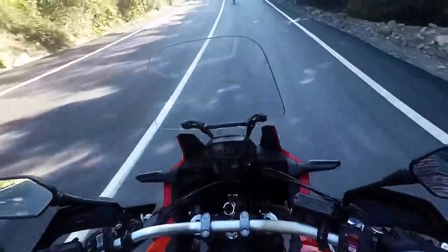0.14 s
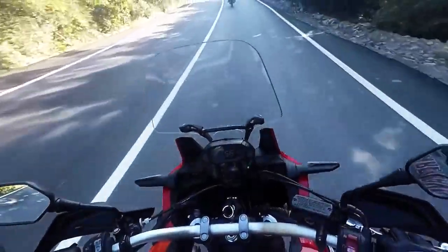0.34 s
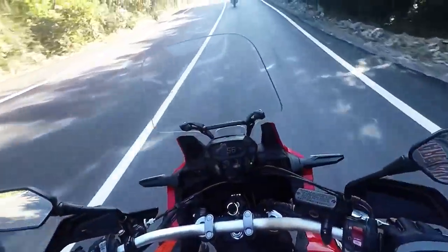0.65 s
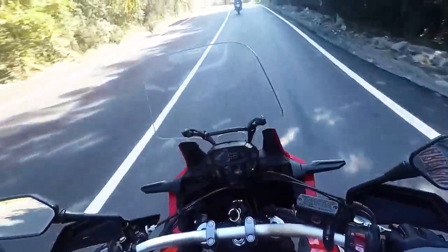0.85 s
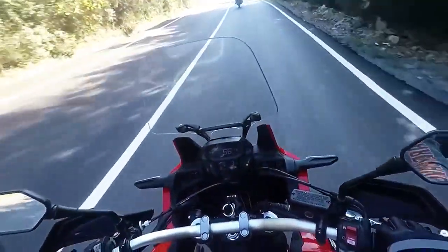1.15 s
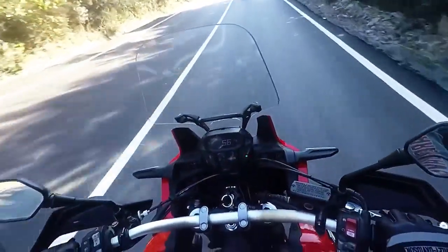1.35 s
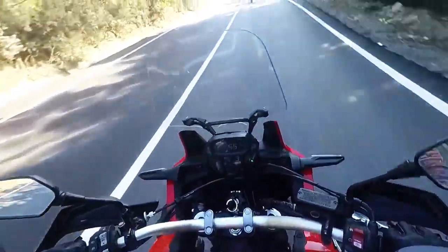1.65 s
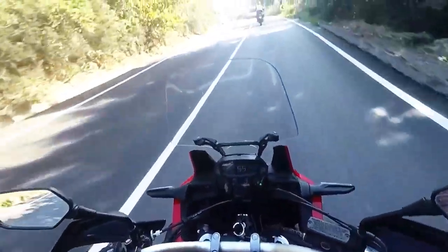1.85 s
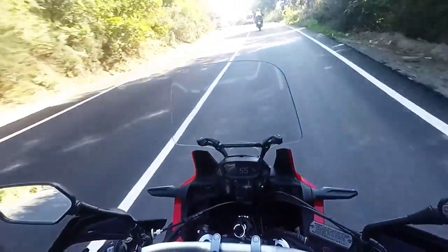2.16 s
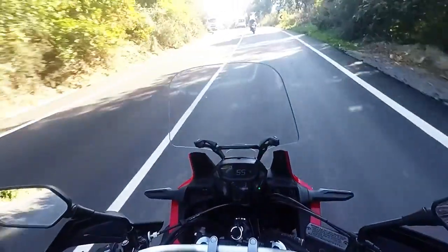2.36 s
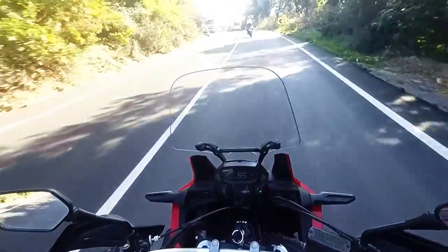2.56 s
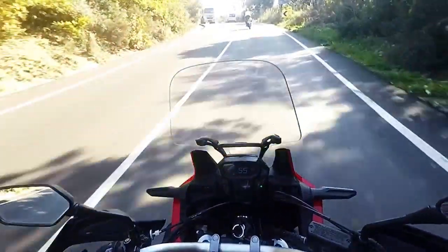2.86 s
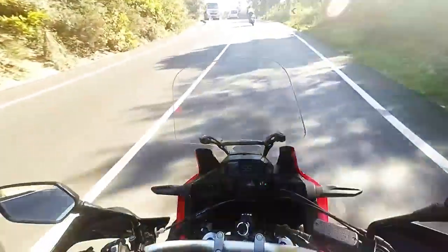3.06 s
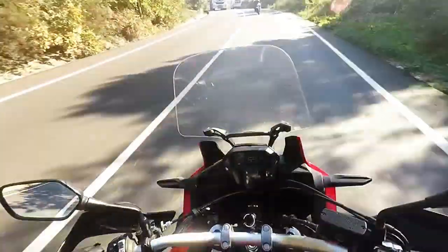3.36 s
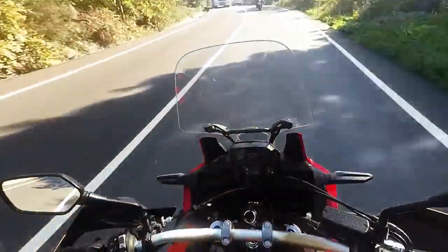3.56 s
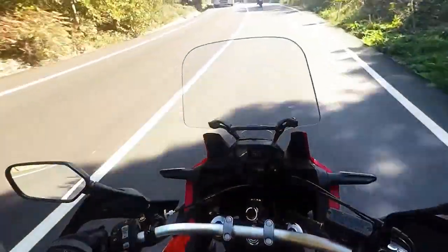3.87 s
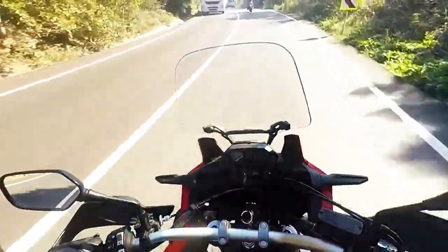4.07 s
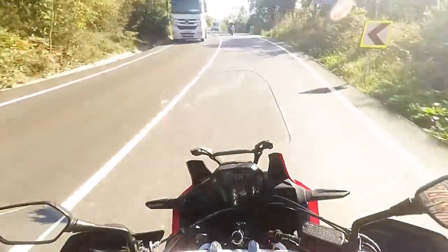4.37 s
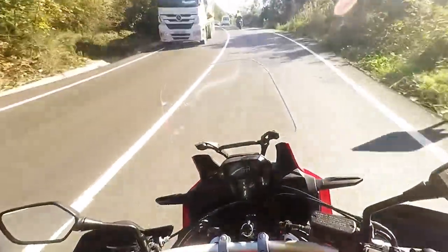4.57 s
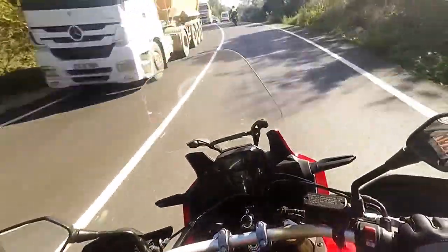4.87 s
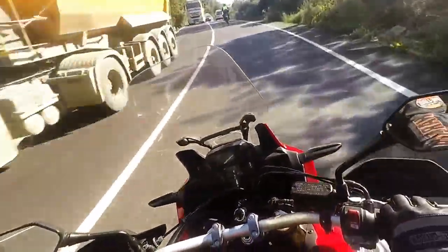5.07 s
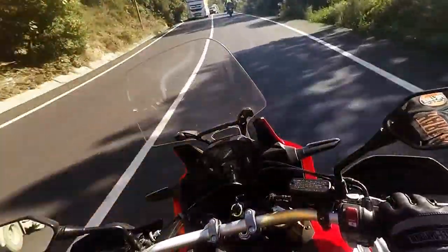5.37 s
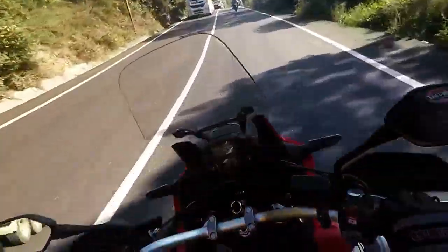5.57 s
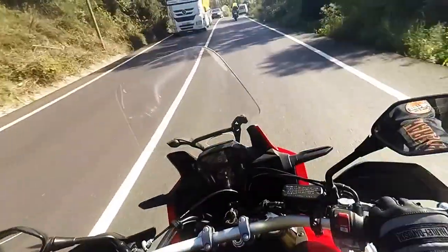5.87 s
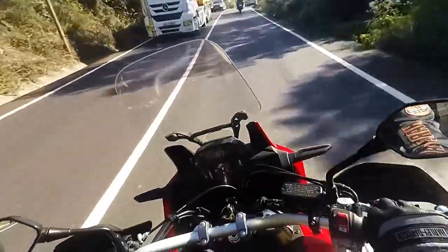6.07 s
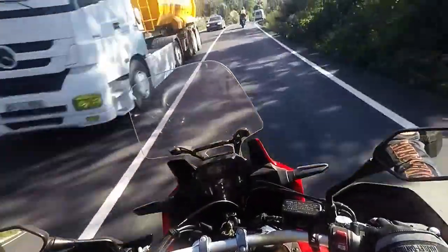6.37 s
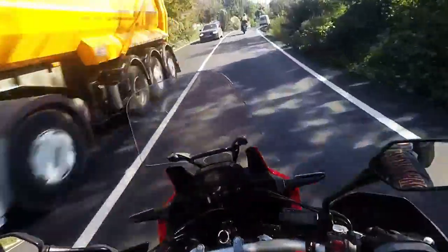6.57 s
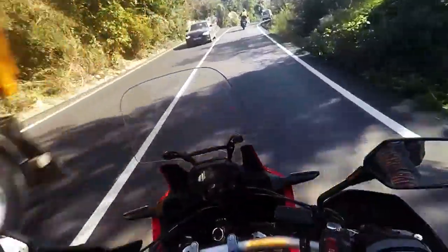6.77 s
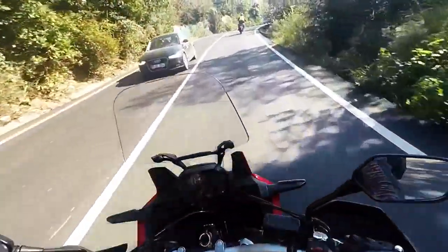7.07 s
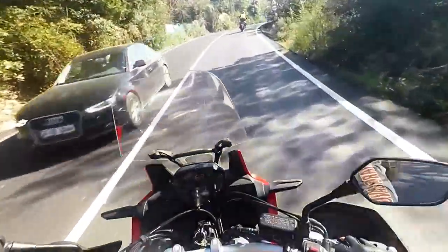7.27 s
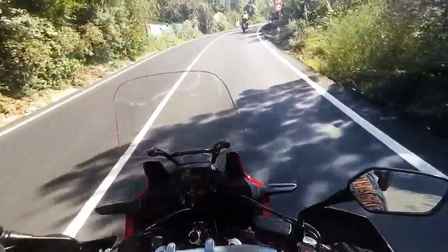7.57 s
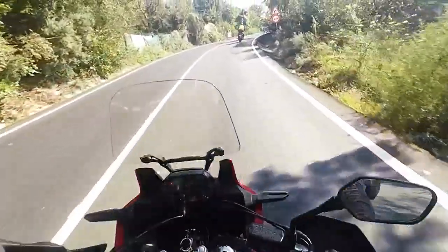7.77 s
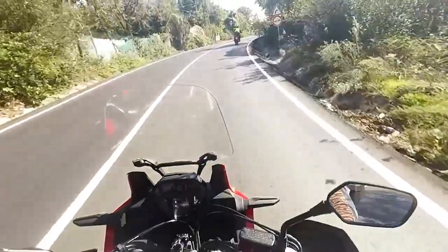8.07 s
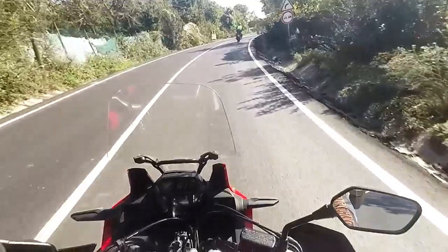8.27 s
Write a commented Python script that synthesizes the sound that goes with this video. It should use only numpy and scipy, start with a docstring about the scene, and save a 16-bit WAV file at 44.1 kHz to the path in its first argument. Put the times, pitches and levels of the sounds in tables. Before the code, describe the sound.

Low wind buffets a small microphone at the rider's place, loud and uneven, over a throbbing low engine hum and pulsing mechanical hiss. After about four seconds the engine chuffs, growls and rises slightly in pitch, then backs off. Oncoming tyre roar swells and fades, and torn air rasps and spits hard against the microphone until the end, outdoors and without noticeable reverberation.

```python
"""A forest road, heard from the rider's place on a twin-cylinder motorcycle, microphone behind the windscreen.
Two lorries and a car pass the other way: tyre roar swells and fades, and gusts of churned air roughen the wind.
Eddies off the screen are sine thumps, with noise for the rumble, the rasp and the sharp gusts.
Closest is the engine, which cruises, pulls for two seconds, then coasts: a sum of cosines at multiples
of its cycle rate, with pulsing noise for the clatter and chuff and thin tones for the gears."""
import sys
import numpy as np
from scipy.fft import rfft, irfft, next_fast_len
from scipy.io import wavfile
from scipy.ndimage import map_coordinates

SR = 44100
rng = np.random.default_rng(int(sys.argv[2]) if len(sys.argv) > 2 else 0)


def to_wav(sig):
    """Store sig (one row per channel, or 1-D mono) as 16-bit WAV at the path in sys.argv[1].

    Samples outside -1..1 are clipped; the rate is SR.
    """
    pcm = np.clip(np.atleast_2d(sig), -1, 1) * 32767
    pcm = np.round(pcm).astype(np.int16)
    wavfile.write(sys.argv[1], SR, pcm.T)  # frames by channels


N = 371322  # samples


def amp(db):
    """Decibels to gain."""
    return 10 ** (np.asarray(db) / 20)


def unit(x):
    """Scale to rms 1."""
    return x / np.sqrt(np.mean(x ** 2) + 1e-20)


def curves(rows):
    """One value per sample for each column after the time."""
    s, *columns = np.transpose(rows)
    t = np.arange(N) / SR
    return [np.interp(t, s, column) for column in columns]


def wobble(rate):
    """A smooth random curve of rms 1, rate knots a second."""
    place = np.arange(N) * rate / SR
    fine = np.arange(0, place[-1] + 1, 1 / 8)
    knots = rng.standard_normal(int(place[-1]) + 4)
    smooth = map_coordinates(knots, [fine])
    return unit(np.interp(place, fine, smooth))


def filtered(x, response):
    """x times a response of frequency."""
    m = next_fast_len(N + SR // 2)
    return irfft(rfft(x, m) * response(np.fft.rfftfreq(m, 1 / SR)), m)[:N]


def noise(spectrum):
    """Noise of rms 1 coloured by (frequency [Hz], level [dB]) points."""
    f, db = np.transpose(spectrum)

    def colour(hz):
        return amp(np.interp(np.log(hz + 1), np.log(f), db))

    return unit(filtered(rng.standard_normal(N), colour))


def turns(hz):
    """Running phase of a changing rate, in radians."""
    return 2 * np.pi * np.cumsum(hz) / SR


def bumps(resonances, hz):
    """Gain in dB of resonances (centre [Hz], width [Hz], gain [dB])."""
    return sum(db / (1 + (2 * (hz - centre) / width) ** 2) for centre, width, db in resonances)


# colour of the tyre roar: (frequency [Hz], relative level [dB])
TYRE_SPECTRUM = [(100, -16), (300, -20), (900, -3), (1800, 16), (3500, 1), (4500, -22), (8000, -20),
                 (13000, -24), (15000, -37)]
# oncoming vehicles: (time abreast [s], time to go by [s], roar when abreast, before the housing [dB])
ONCOMING = [(5.25, 0.18, -35.5), (6.8, 0.23, -38), (7.4, 0.084, -38)]


def traffic():
    """Tyre roar of the other lane swells and falls as one over the distance to the microphone."""
    t = np.arange(N) / SR
    power = sum(amp(db) ** 2 / (1 + ((t - s) / span) ** 2) for s, span, db in ONCOMING)
    return noise(TYRE_SPECTRUM) * np.sqrt(power)


def whine():
    """A faint, fuzzy tone high in the treble."""
    pitch_hz = 12408 + 18 * wobble(100)
    return amp(-71 + 3 * wobble(60)) * np.sin(turns(pitch_hz))


# strength of the air stream off the windscreen: (time [s], relative level [dB])
AIR_STREAM = [(0.0, -8.5), (0.23, -20), (0.47, -19.5), (0.52, -26.5), (0.68, -19.5), (1.05, -27),
              (1.08, -19), (1.2, -11), (1.48, -19), (1.71, -15), (1.76, -22), (1.92, -14), (2.2, -27),
              (2.25, -18.5), (2.49, -24), (2.53, -13.5), (2.91, -16.5), (2.93, -19), (3.02, -14),
              (3.3, -25.5), (3.35, -14), (3.4, -16.5), (3.89, -15.5), (3.91, -15.5), (4.15, -25),
              (4.31, -23), (4.36, -13.5), (4.48, -27.5), (4.55, -10), (4.71, -22.5), (4.76, -13),
              (4.83, -16.5), (4.9, -11), (5.11, -16.5), (5.23, -27), (5.27, -15), (5.51, -23.5),
              (5.56, -16), (6.61, -15), (6.63, -24), (6.71, -11), (6.78, -19), (6.89, -12), (7.66, -16),
              (7.75, -23), (7.82, -17), (8.07, -11), (8.09, -16.5), (8.35, -18), (8.42, -17)]


def air_stream():
    """Strength in dB of the stream off the screen, which drives thump, rumble and rasp alike."""
    return curves(AIR_STREAM)[0]


# gusts of churned air, strongest behind the oncoming vehicles:
# (start [s], rise [s], hold [s], relative rasp gain [dB], relative rumble gain [dB])
CHURNED_AIR = [(0.196, 0.016, 0.078, -39.5, -30), (1.127, 0.036, 0.26, -38, -32),
               (2.56, 0.026, 0.2, -37, -36), (2.94, 0.024, 0.08, -34, -26.5),
               (4.247, 0.053, 0.043, -38.5, -32), (4.7, 0.068, 0.35, -33, -27.5),
               (5.154, 0.047, 0.1, -33, -21.5), (5.527, 0.022, 0.17, -32.5, -19.5),
               (5.903, 0.028, 0.36, -31, -23), (6.615, 0.043, 0.099, -29, -19),
               (6.839, 0.12, 0.19, -23, -24), (7.177, 0.025, 0.16, -25.5, -27.5),
               (7.593, 0.035, 0.2, -29, -22), (7.817, 0.021, 0.016, -28, -20.5),
               (7.888, 0.016, 0.026, -29.5, -24), (7.951, 0.03, 0.14, -29, -24),
               (8.18, 0.15, 0.14, -33, -22)]
GUST_RELEASE_S = 0.045


def gusts():
    """Rasp and rumble gains of the churned air: each gust rises, holds and dies away."""
    t, rasp, rumble = np.arange(N) / SR, np.zeros(N), np.zeros(N)
    for start, rise, hold, rasp_db, rumble_db in CHURNED_AIR:
        attack = np.clip((t - start) / rise, 0, 1)
        since_hold = np.maximum(t - start - rise - hold, 0)
        shape = attack * np.exp(-since_hold / GUST_RELEASE_S)
        rasp += amp(rasp_db) * shape
        rumble += amp(rumble_db) * shape
    return rasp, rumble


# colours of the wind at the microphone: low rumble, torn air, the fiercest air;
# each (frequency [Hz], relative level [dB])
RUMBLE_SPECTRUM = [(20, 0.5), (55, -3.5), (78, -5), (94, 1.5), (125, -11), (190, -15), (300, -23.5),
                   (600, -36), (1500, -34), (3000, -120)]
RASP_SPECTRUM = [(150, -5), (350, -7), (520, -5), (750, -3), (1300, -7), (2200, -5.5), (3000, 1.5),
                 (3650, 0), (4200, -14.5), (5500, -19), (7500, -24), (10000, -28), (12500, -35),
                 (15000, -52)]
FIZZ_SPECTRUM = [(300, -30), (3000, -10), (4200, -10), (5800, 7), (8000, 0), (11000, -8), (13000, -9),
                 (15000, -24)]
USUAL_WIND_DB = -18
# base gain in the usual wind [dB]; growth [dB per dB of wind]
RUMBLE_DB, RUMBLE_GROWS = -33, 0.95
RASP_DB, RASP_GROWS = -37, 0.35
# fizz gain relative to the rasp [dB]; rasp gain at which it is half in [dB]
FIZZ_DB, FIZZ_FROM_DB = -17.5, -24


def wind(wind_db, shedding, grit_db, calm_db, lumps_db, surge_db):
    """Turbulence rumbles; once the flow tears, air rasps with each eddy, and at its fiercest fizzes."""
    excess_db = wind_db - USUAL_WIND_DB
    gust_rasp, gust_rumble = gusts()
    # stream and gusts add as powers
    rumble = np.hypot(amp(RUMBLE_DB + RUMBLE_GROWS * excess_db), gust_rumble)
    rumble = rumble * amp(lumps_db * wobble(20))
    rasp = np.hypot(amp(RASP_DB + RASP_GROWS * excess_db), gust_rasp)
    rasp = rasp * amp(surge_db * np.tanh(wobble(22)))
    # soft thresholds, from 0 to 1
    torn = 1 / (1 + (amp(calm_db) / rasp) ** 2)
    fierce = 1 / (1 + (amp(FIZZ_FROM_DB) / rasp) ** 2)
    flutter_db = 2.3 * np.cos(shedding) + 2.0 * np.tanh(wobble(110))
    spits = unit(amp(flutter_db + grit_db * wobble(450)))
    hiss = noise(RASP_SPECTRUM) * torn + noise(FIZZ_SPECTRUM) * fierce * amp(FIZZ_DB)
    return noise(RUMBLE_SPECTRUM) * rumble, hiss * spits * rasp


def eddies(shed_hz):
    """Running phase of the eddies, which leave the screen at a wandering rate."""
    wander = .15 * wobble(55) + .17 * wobble(170)
    return turns(shed_hz * np.exp(wander))


def buffet(wind_db, shedding, gain_db, lull_db, edge_db):
    """Each eddy thumps with a steepened front and its own strength; now and then the shedding lulls."""
    strength_db = 2.8 * np.tanh(wobble(70))
    bunches = unit(1 / (1 + amp(lull_db - 13 * wobble(34))))
    swing = np.sin(shedding) + amp(edge_db) * np.sin(2 * shedding)  # the second harmonic steepens it
    return np.sqrt(2) * swing * bunches * amp(wind_db + gain_db + strength_db)


# sharp gusts that strike the microphone:
# (time of peak [s], relative spit level [dB], rise [s], relative lower bark level [dB])
STRIKES = [(0.257, -27, 0.017, -43), (0.333, -22, 0.014, -40), (1.817, -21, 0.0037, -40),
           (1.857, -25.5, 0.0054, -35), (2.237, -25.5, 0.0063, -38), (2.603, -25, .004, -25),
           (2.712, -22.5, 0.0061, -36), (2.915, -25, 0.0063, -30), (3.072, -26.5, .005, -34),
           (3.692, -20.5, 0.0056, -40), (4.362, -22.5, 0.0057, -33), (4.509, -28, 0.0026, -29),
           (4.793, -23, .004, -23), (4.835, -14, 0.003, -18), (5.249, -24, .008, -20),
           (5.282, -17, 0.0035, -30), (5.545, -21, 0.0037, -27), (5.702, -24, .004, -26),
           (5.649, -17.5, 0.0054, -24), (5.856, -20.5, 0.0077, -41), (5.916, -15, .004, -25),
           (5.957, -18, 0.0076, -22), (5.985, -10, 0.0064, -16.5), (6.075, -18, 0.0049, -26),
           (6.145, -18, 0.0034, -24), (6.19, -17, .003, -25), (6.288, -21, 0.0042, -34),
           (6.316, -17, 0.0062, -24), (6.359, -20.5, 0.013, -33), (6.488, -23, 0.0036, -24),
           (6.536, -13.5, 0.0047, -43), (6.679, -24, 0.003, -27), (6.739, -12, 0.0057, -17),
           (6.747, -12.5, 0.0029, -29), (6.868, -16, 0.0073, -33), (6.939, -15, 0.0027, -31),
           (7.049, -17, 0.0053, -25), (7.116, -14, 0.02, -21.5), (7.178, -13, 0.0036, -17.5),
           (7.246, -16, 0.0026, -39.5), (7.267, -15, 0.0069, -34), (7.304, -21, 0.011, -30),
           (7.35, -17, 0.0098, -23), (7.409, -20.5, 0.0042, -25), (7.5, -23, 0.01, -21),
           (7.57, -20.5, 0.024, -26), (7.626, -18, 0.0087, -41), (7.646, -17, 0.014, -43),
           (7.742, -21, 0.0099, -31), (7.774, -23, 0.0057, -24), (7.92, -19, 0.0056, -27),
           (7.953, -21, .004, -19), (7.961, -14, 0.0063, -26), (8.033, -14.5, 0.0036, -36),
           (8.076, -22, 0.0046, -35), (8.199, -22.5, 0.011, -25), (8.291, -28, 0.0025, -26),
           (8.318, -17, 0.0087, -23), (8.336, -12.5, 0.0035, -24), (8.398, -20, 0.0032, -20)]
# colours of a gust's spit and of its lower bark: (frequency [Hz], relative level [dB])
SPIT_SPECTRUM = [(150, -45), (400, -13), (1300, -14.5), (2200, -14), (3000, -3), (3600, -2.5), (4200, -19),
                 (5500, -22), (7500, -31.5), (12500, -43), (15000, -54)]
BARK_SPECTRUM = [(150, -27), (400, -12), (1200, 1), (1800, 6), (2200, 1.5), (2800, 3), (3800, -26),
                 (5500, -17), (8000, -20), (12000, -27), (15000, -45)]


def slaps(gain_db):
    """Each sharp gust is a gritty spit of its own length, with its own share of lower bark, faint to strong."""
    t, spit, bark = np.arange(N) / SR, np.zeros(N), np.zeros(N)
    for s, spit_db, rise, bark_db in STRIKES:
        near = slice(*np.searchsorted(t, [s - rise, s + 10 * rise]))
        age = (t[near] - s) / rise + 1  # 0 at the start, 1 at the peak
        swell = (age * np.exp(1 - age)) ** 2
        spit[near] += amp(spit_db) * swell
        bark[near] += amp(bark_db) * swell
    grit_db = 1.2 * wobble(600)
    return (spit * noise(SPIT_SPECTRUM) + bark * noise(BARK_SPECTRUM)) * amp(gain_db + grit_db)


# engine speed: (time [s], four-stroke cycle rate [cycles/s])
CYCLE_RATE = [(0.0, 24.08), (1.1, 23.95), (1.6, 23.67), (2.9, 23.45), (3.3, 23.62), (3.75, 24.0),
              (4.25, 24.98), (5.1, 27.23), (5.85, 28.98), (6.2, 28.68), (6.6, 28.03), (7.0, 27.0),
              (7.4, 26.43), (7.9, 26.2), (8.42, 26.23)]


def engine_speed():
    """Cycle rate, in cycles a second, that the note and the mechanical noises follow."""
    return curves(CYCLE_RATE)[0]


# throttle hand: (time [s], opening [0 shut, 1 barely open, 2 cruising, 3 pulling])
THROTTLE_HAND = [(0, 2.03), (1.5, 2), (2.8, 2), (3.7, 2.04), (4.2, 2.3), (4.7, 2.8), (5.2, 3), (5.83, 3),
                 (6.08, 0), (6.7, 0), (7.5, 1), (8.42, 1)]


def throttle_opening():
    """Opening of the throttle, from 0 shut to 3 pulling."""
    return curves(THROTTLE_HAND)[0]


# how the mechanical noise grows with load: (throttle opening [0-3], gain [dB])
LOAD_GAIN = [(1, -2.5), (2, 0), (2.04, .6), (2.3, 2), (3, 2.6)]


def load_gain_db(throttle):
    """A more open throttle loads the moving parts harder, so they sound louder."""
    return np.interp(throttle, *np.transpose(LOAD_GAIN))


# thin whines of the gears, cam chain and valve train:
# (multiple of the cycle rate, level at cruising throttle before wavering [dB])
SHAFT_TONES = [(25.5, -54), (33, -58), (41, -60), (42, -60), (56, -59), (60, -61), (71, -57), (74, -57.5),
               (76, -54.5), (78, -58.5), (87, -60), (90, -57), (99, -60), (142, -57.5), (143, -58),
               (153, -57.5)]


def gear_tones(speed, throttle, waver_db):
    """Each whine follows the shaft, wavers and grows with load; the lowest fades as the revs climb."""
    out, cycle = np.zeros(N), turns(speed)
    lowest_fade = np.interp(speed, [24.3, 25.5], [1, .15])
    for k, (order, db) in enumerate(SHAFT_TONES):
        drift = .4 * wobble(12)
        level = amp(db + waver_db * wobble(7.8))
        if k == 0:
            level = level * lowest_fade
        out += level * np.cos(order * cycle + drift + rng.uniform(0, 2 * np.pi))
    return np.sqrt(2) * out * amp(load_gain_db(throttle))


def gear_whine(speed, mesh, db):
    """A fuzzy whine tied to the shaft, clearest as the gears take up the overrun."""
    t = np.arange(N) / SR
    load = np.interp(t, [3.5, 5.5, 6.6, 7.5], [.25, .8, 1, .3])
    pitch_hz = mesh * speed + 60 * wobble(300)
    return amp(db + 2.9 * wobble(40)) * load * np.sin(turns(pitch_hz))


# colour of the engine clatter: (frequency [Hz], relative level [dB])
METAL_SPECTRUM = [(150, -10), (300, -6), (500, -7), (700, -5), (900, -5), (1150, -4), (1400, -3.5),
                  (2000, -5), (3500, -5), (4300, -15), (5500, -19), (7500, -23), (9500, -26.5),
                  (12500, -27.5), (15000, -35.5)]
# engine parts that ring under the clatter: (centre [Hz], width [Hz], gain [dB])
RINGING_CASINGS = [(1706, 110, 3.5), (4610, 136, 7), (5140, 670, 6), (7560, 1020, 9)]
CLATTER_DB, CLATTER_DB_PER_REV = -38, 0.95  # base gain cruising; dB per extra cycle a second
CRUISE_RATE = 24  # cycles a second


def clatter(speed, throttle, beat_db, grain_db):
    """Valve gear and chain hiss grows with revs and load, pulses with the cycle and rings in the casings."""
    level_db = CLATTER_DB + CLATTER_DB_PER_REV * (speed - CRUISE_RATE) + load_gain_db(throttle)
    cycle = turns(speed)
    slow_beat = .6 * np.cos(cycle) + .6 * np.cos(2 * cycle + 2) + .8 * np.cos(3 * cycle)
    beat = unit(slow_beat + .6 * np.cos(5 * cycle) + .5 * np.cos(6 * cycle))
    ticking = noise(METAL_SPECTRUM) * amp(level_db + beat_db * beat + grain_db * wobble(400))
    return filtered(ticking, lambda hz: amp(bumps(RINGING_CASINGS, hz)))


def tank_echo(x, delay, db):
    """One short reflection off the bodywork, delay in seconds, ripples the spectrum."""
    return filtered(x, lambda hz: 1 + amp(db) * np.exp(-2j * np.pi * hz * delay))


# colour of the labouring chuff: (frequency [Hz], relative level [dB])
KNOCK_SPECTRUM = [(300, -22), (1200, -4), (2300, -1.5), (2900, 2), (3600, -6), (4300, -21), (7500, -18.5),
                  (15000, -48)]
KNOCK_DB, KNOCK_FROM_S = -37, 4.155  # base gain as the load comes on; time of one firing


def knock(speed, throttle, sharpness, scatter_db):
    """As the throttle opens, the engine gives one uneven, dry chuff each cycle."""
    cycle = turns(speed)
    since_firing = cycle - cycle[int(KNOCK_FROM_S * SR)]
    pulse = unit(np.exp(sharpness * np.cos(since_firing)))
    labour = np.interp(throttle, [2, 2.25, 2.6, 3], [.25, 1, 1, .4])
    labour = labour * np.clip(throttle - 1, 0, 1)  # silent with the throttle barely open or shut
    return noise(KNOCK_SPECTRUM) * pulse * labour * amp(KNOCK_DB + scatter_db * wobble(25))


# exhaust and intake note: (multiple of the cycle rate,
# relative level with throttle shut [dB], barely open [dB], cruising [dB], pulling [dB])
NOTE_ORDERS = [(3, -39, -44, -43, -37), (4, -48, -42, -41, -52), (5, -36.5, -41, -35.7, -34.3),
               (6, -36.5, -44, -39.5, -34), (7, -44, -49, -62, -49), (8, -45.5, -39.5, -41.5, -40.5),
               (9, -55, -44, -45, -42), (10, -60, -55, -47, -66), (11, -46, -57, -48, -55),
               (12, -66, -66, -67, -54), (13, -57, -62, -70, -55), (14, -55, -62, -56.5, -50),
               (15, -54, -66, -66, -55), (16, -61, -58, -67, -49.5), (17, -66, -68, -69, -50),
               (18, -66, -59, -67, -52.5), (19, -66, -61, -57.5, -50), (20, -60, -68, -62.5, -51),
               (21, -68, -64, -59, -50), (22, -68, -70, -74, -46.5), (23, -64, -68, -69, -52),
               (24, -68, -70, -57.5, -55), (25, -62, -64, -69, -57), (26, -66, -62, -63.5, -58),
               (29, -66, -68, -72, -53.5), (30, -62, -64, -72, -56), (31, -66, -68, -72, -55),
               (35, -58, -62, -65, -53.5), (36, -66, -66, -68, -61), (37, -68, -66, -65, -58)]
# loudness of the note, which sinks in the second lorry's wake:
# (time [s], exhaust gain [dB], intake gain [dB])
NOTE_LOUDNESS = [(0, 0, .7), (2.6, 0, 0), (3.3, .5, 3.5), (4.15, -.5, 5), (4.7, 0, 1.8), (5.2, 0, 1.2),
                 (5.8, 0, 1.5), (6.4, 1, 0), (7.1, -5, -4), (7.7, 0, 0)]
# fixed resonances and dips of the intake that the note slides through: (centre [Hz], width [Hz], gain [dB])
INTAKE_RESONANCES = [(275, 26, 7), (312, 35, -4.5), (358, 35, -4), (460, 40, 3), (580, 48, 8),
                     (655, 60, -9), (845, 50, 5)]
INTAKE_FROM_ORDER = 11  # lower multiples belong to the exhaust


def engine_note(speed, throttle, phase_spread, shake_db, waver_db):
    """Multiples of the cycle rate; the open throttle brings in the intake's pulsing growl."""
    out, cycle = np.zeros(N), turns(speed)
    exhaust_db, intake_db = curves(NOTE_LOUDNESS)
    for order, *levels in NOTE_ORDERS:
        hz, intake = order * speed, order >= INTAKE_FROM_ORDER
        size = np.interp(throttle, np.arange(len(levels)), amp(levels))
        loudness_db = intake_db if intake else exhaust_db
        # the moving air makes each multiple waver on its way to the microphone
        colour = amp(loudness_db + bumps(INTAKE_RESONANCES, hz) + waver_db * wobble(6))
        # one throb a cycle, drawn out by the ringing of each resonance
        lag = sum(2 * np.arctan(2 * (hz - centre) / width)
                  for centre, width, db in INTAKE_RESONANCES if db > 0)
        # the low multiples start at more widely scattered phases
        spread = phase_spread * (1 if intake else 3)
        out += size * colour * np.cos(order * cycle - lag + spread * rng.standard_normal())
    return np.sqrt(2) * out * amp(shake_db * wobble(45))


# resonances of the microphone housing: (centre [Hz], width [Hz], gain [dB])
HOUSING_RESONANCES = [(1795, 203, 7), (2190, 180, 1.5), (2550, 71, -0.5), (2650, 120, 1.5), (3550, 760, 5),
                      (4100, 260, -3.5), (7010, 170, 3.5)]


def housing(x):
    """The small cavities in front of the microphone colour all that hisses."""
    return filtered(x, lambda hz: amp(bumps(HOUSING_RESONANCES, hz)))


def scene():
    """Traffic, wind and engine at one microphone."""
    wind_db = air_stream()
    shedding = eddies(shed_hz=39.88)
    rumble, rasp = wind(wind_db, shedding, grit_db=2.0, calm_db=-39.5, lumps_db=1.0, surge_db=2.0)
    thump = buffet(wind_db, shedding, gain_db=-1.0, lull_db=-11, edge_db=-22)
    spits = slaps(gain_db=-6.7)
    speed = engine_speed()
    throttle = throttle_opening()
    gears = gear_whine(speed, mesh=171, db=-51) + gear_tones(speed, throttle, waver_db=2)
    mechanics = tank_echo(clatter(speed, throttle, beat_db=1.0, grain_db=1.4), delay=0.002192, db=-15.5)
    chuff = knock(speed, throttle, sharpness=1.9, scatter_db=0.5)
    note = amp(.5) * engine_note(speed, throttle, phase_spread=.55, shake_db=.4, waver_db=.7)
    hiss = amp(-2.0) * housing(traffic() + rasp + spits + mechanics + chuff)
    return (whine() + rumble + thump + hiss + gears + note)[None]


TOP_HZ = 15300


def record(dry):
    """Nothing is kept above the band limit."""
    return filtered(dry[0], lambda hz: hz < TOP_HZ)[None]


dry = scene()
out = record(dry)
to_wav(out)
```